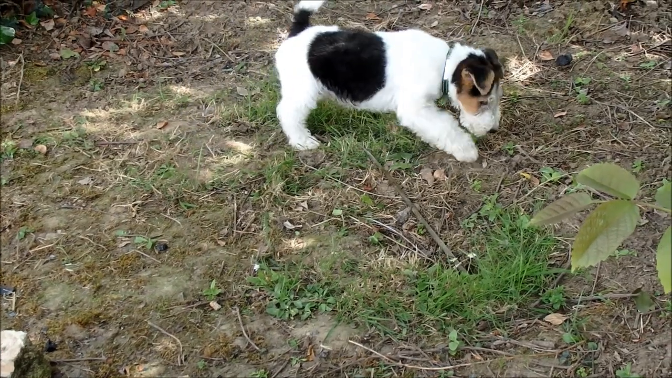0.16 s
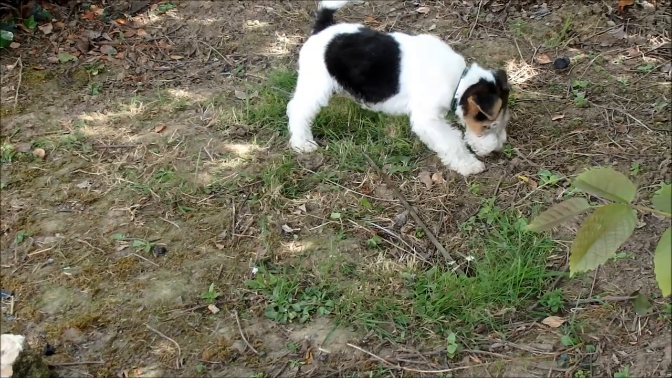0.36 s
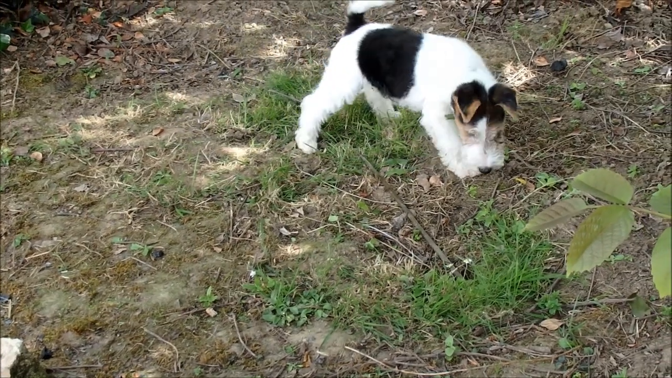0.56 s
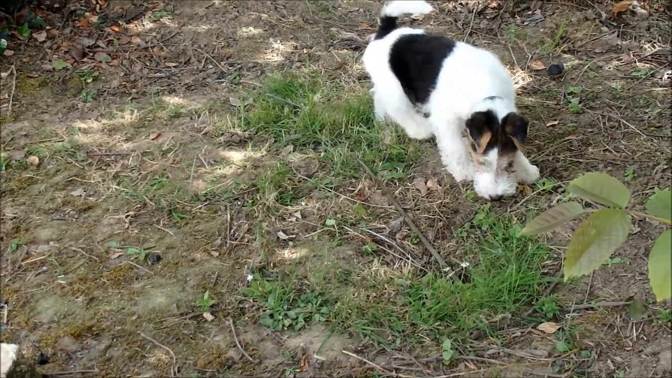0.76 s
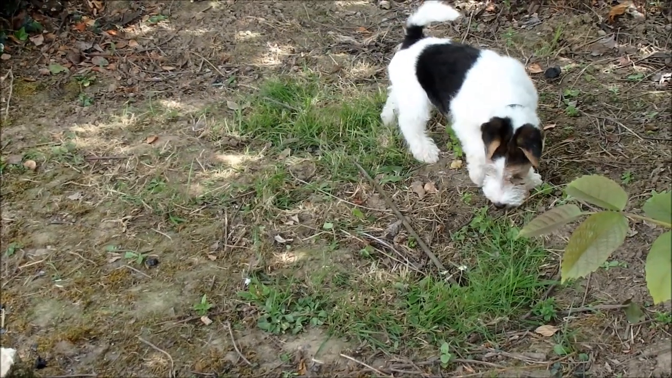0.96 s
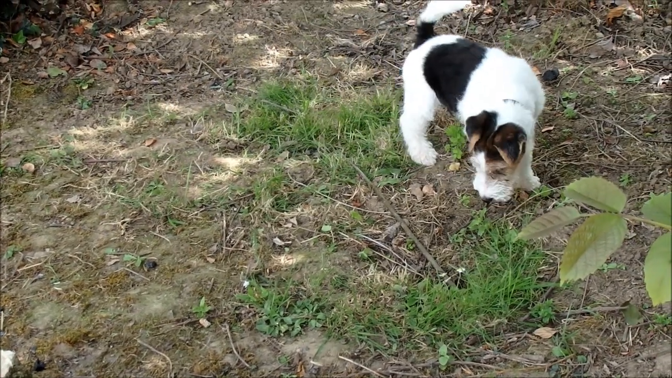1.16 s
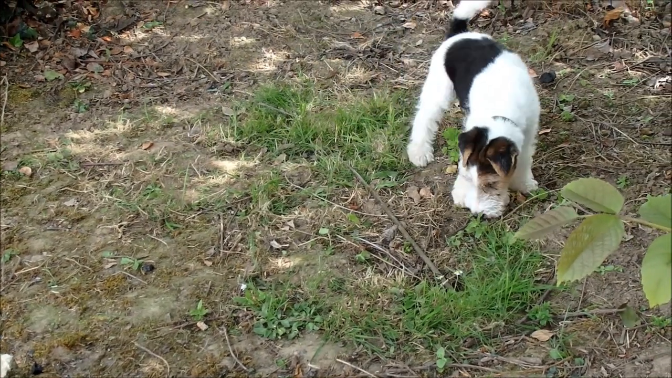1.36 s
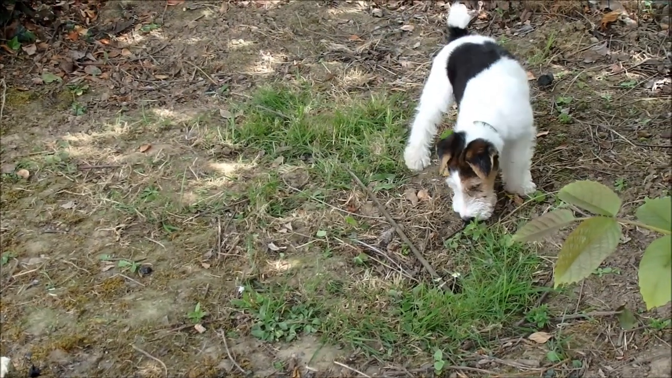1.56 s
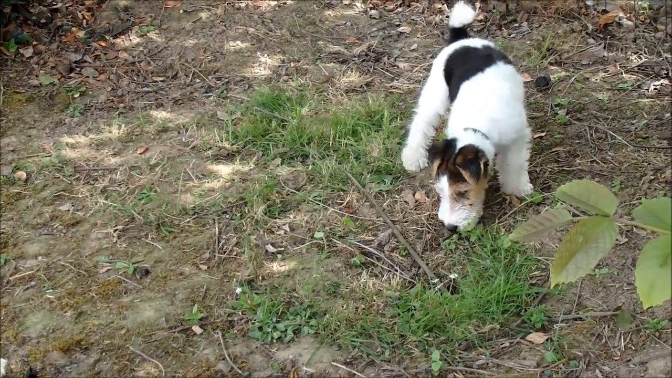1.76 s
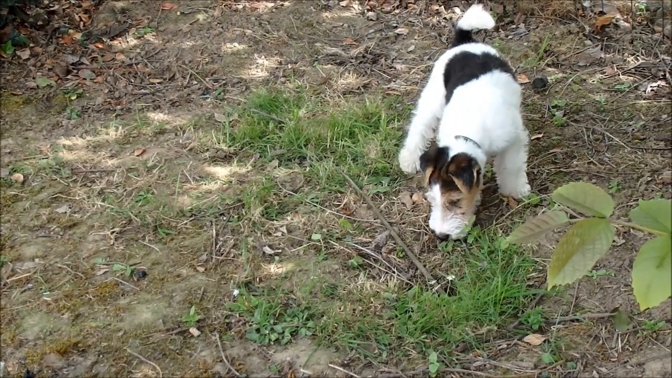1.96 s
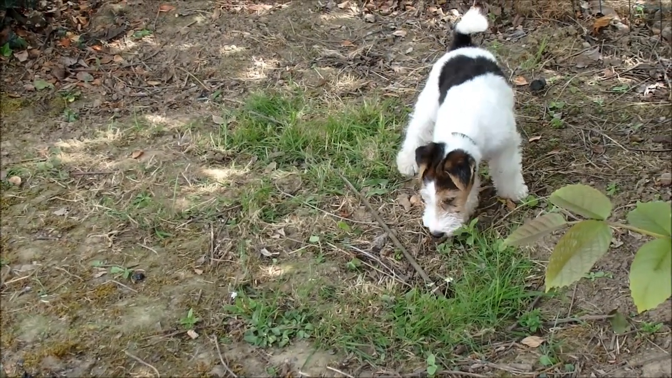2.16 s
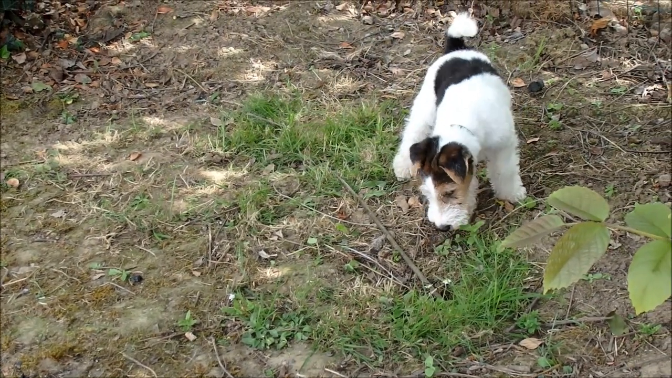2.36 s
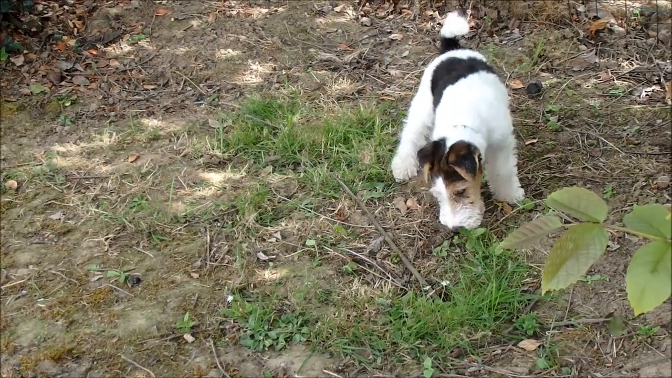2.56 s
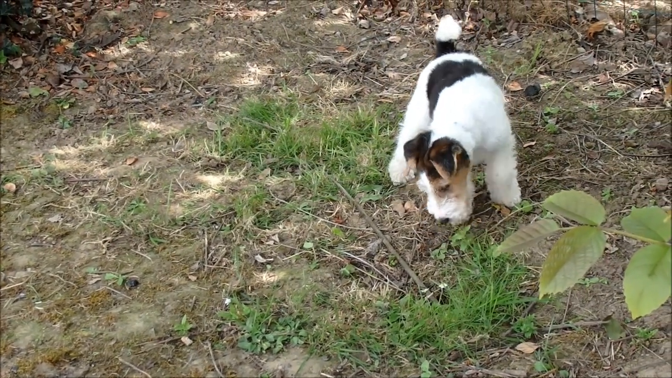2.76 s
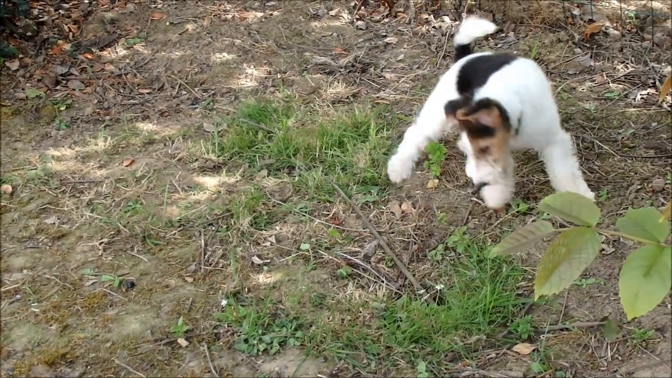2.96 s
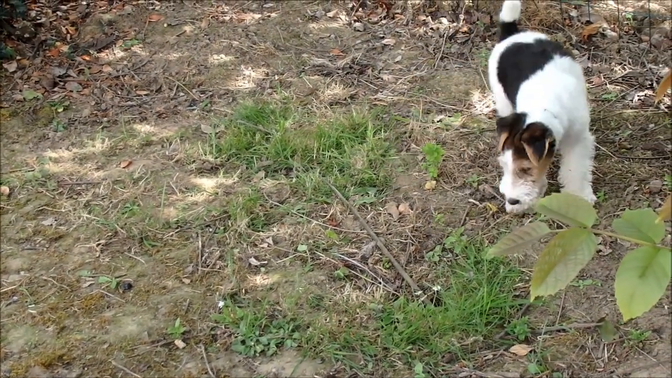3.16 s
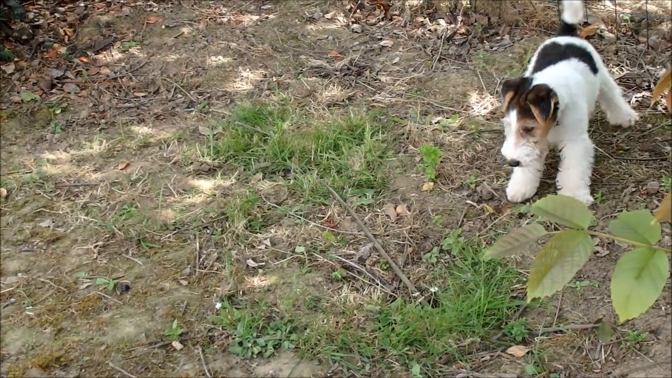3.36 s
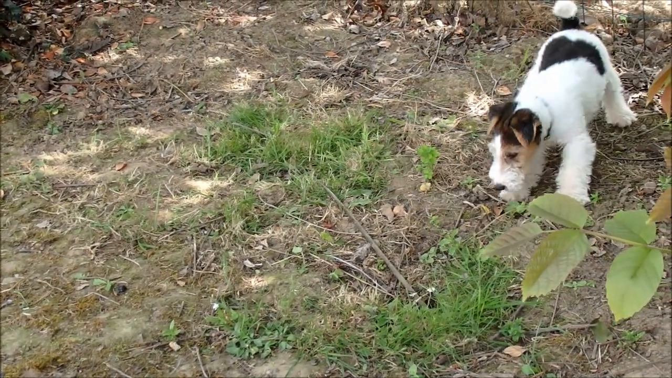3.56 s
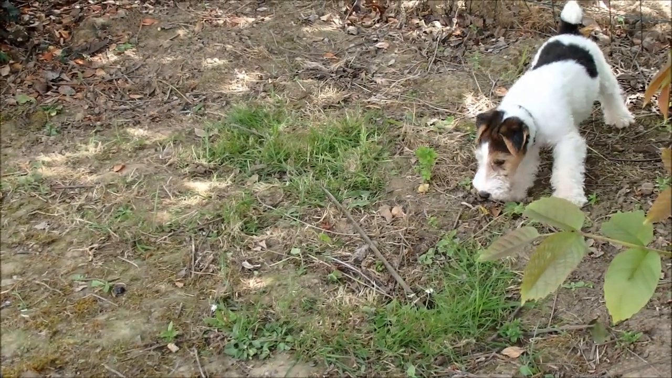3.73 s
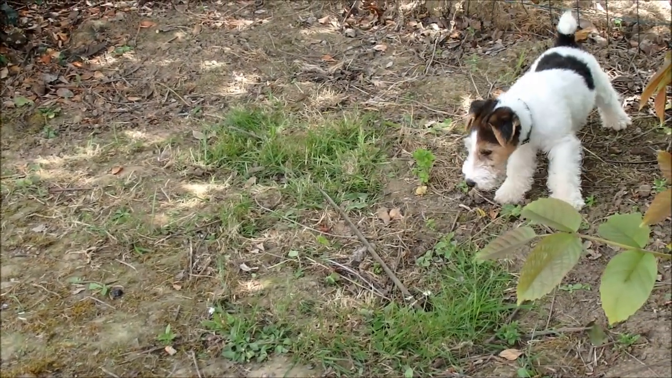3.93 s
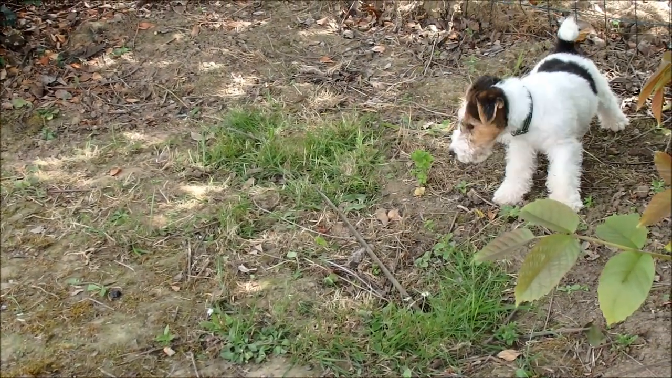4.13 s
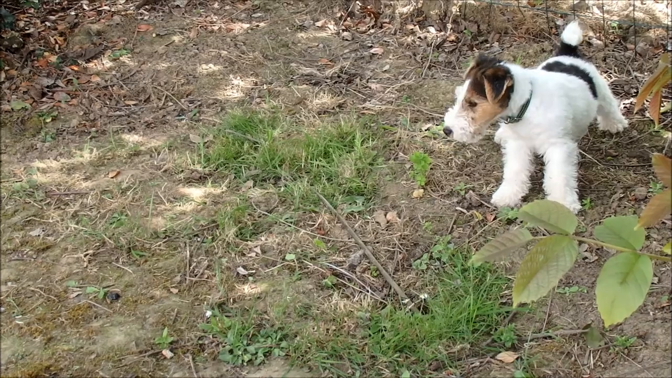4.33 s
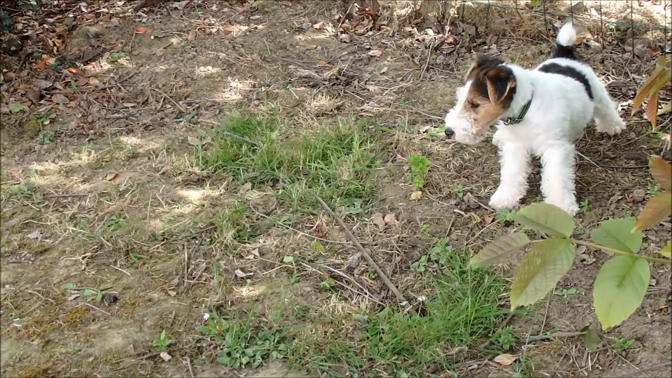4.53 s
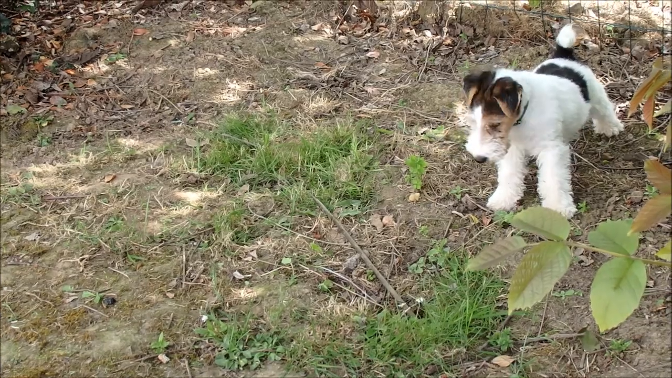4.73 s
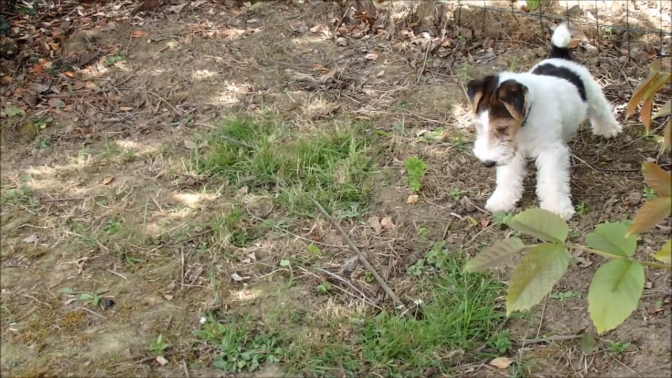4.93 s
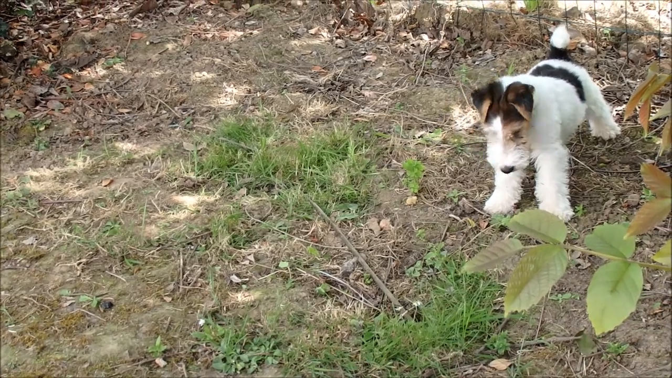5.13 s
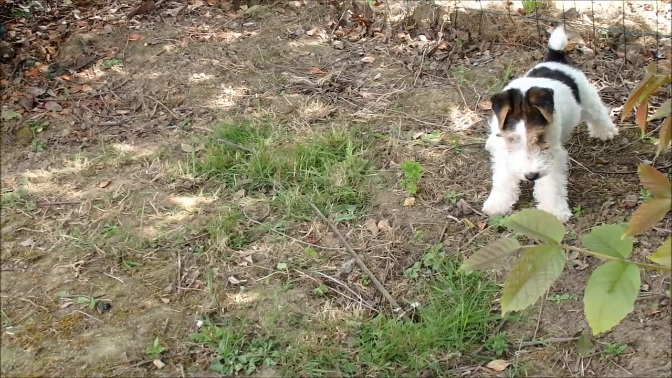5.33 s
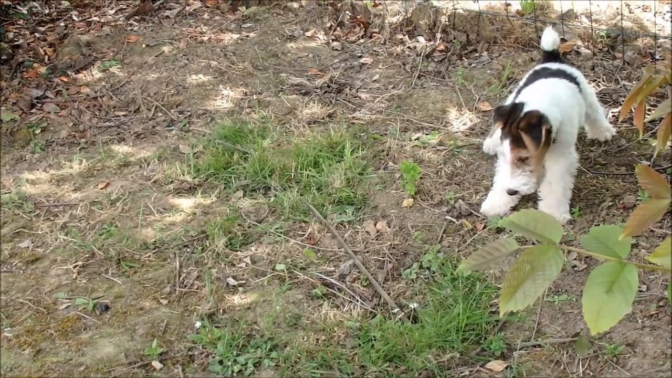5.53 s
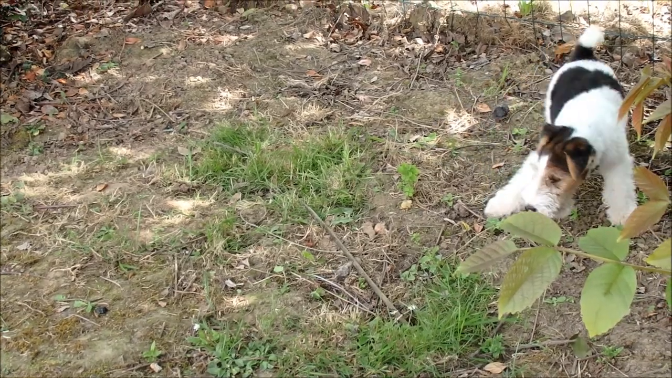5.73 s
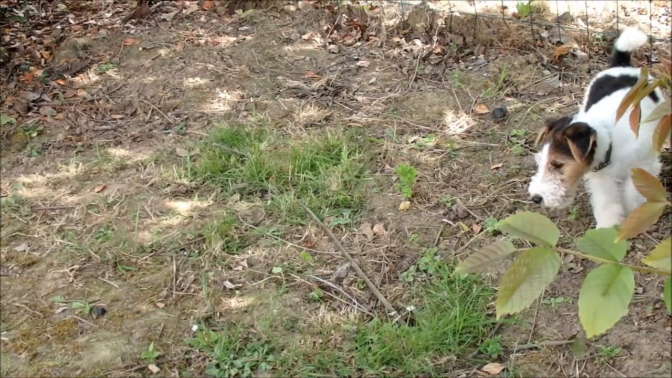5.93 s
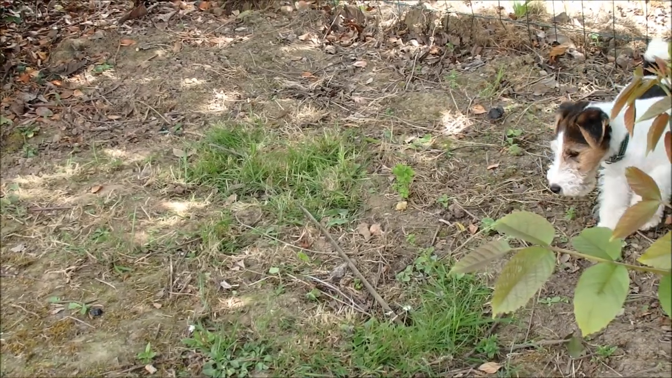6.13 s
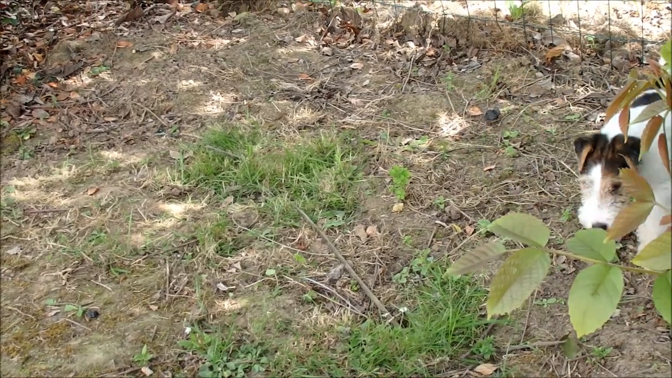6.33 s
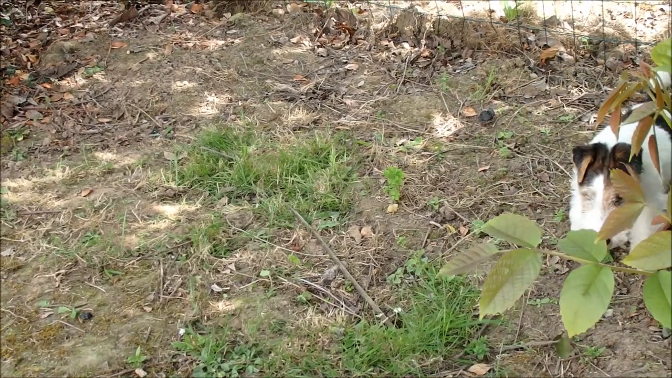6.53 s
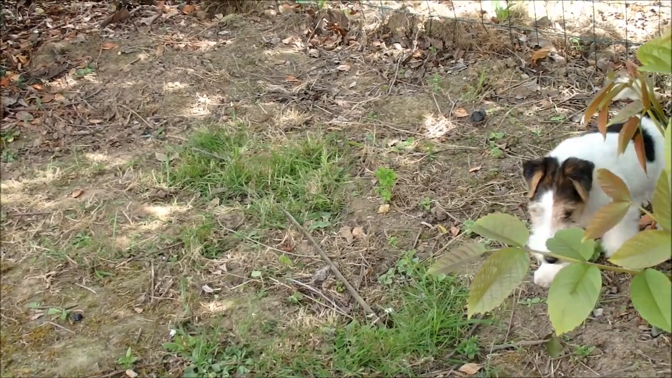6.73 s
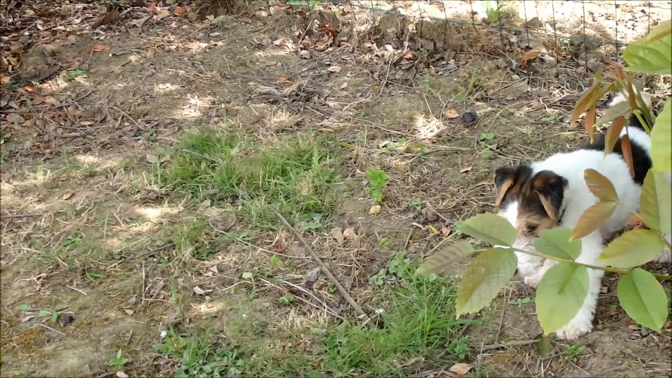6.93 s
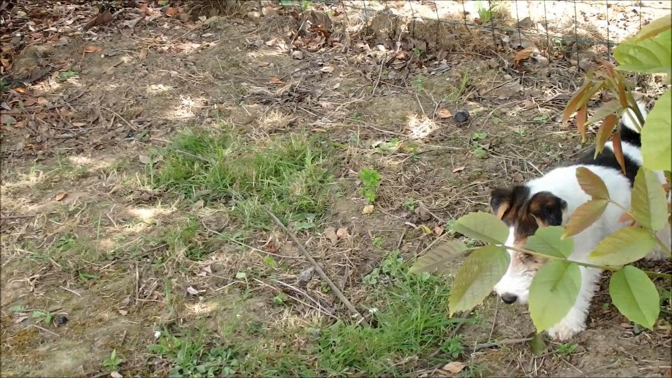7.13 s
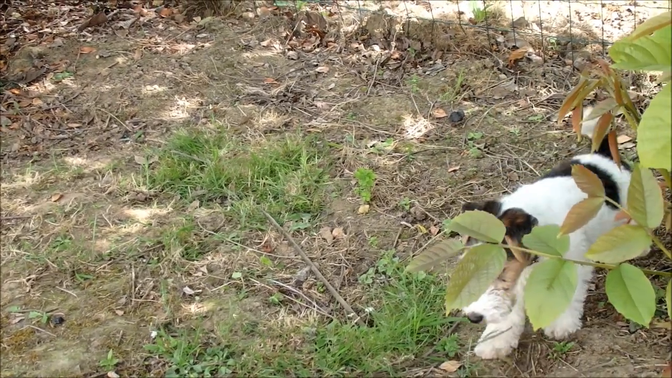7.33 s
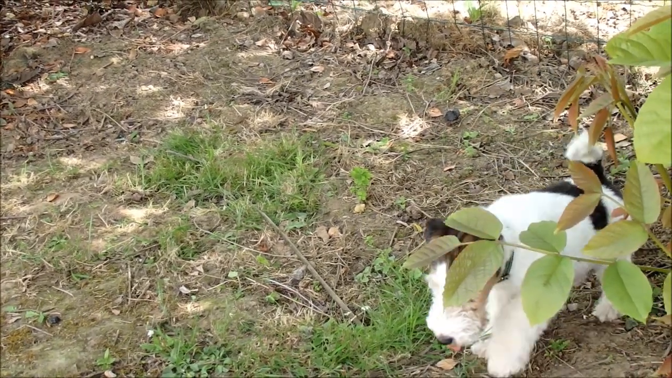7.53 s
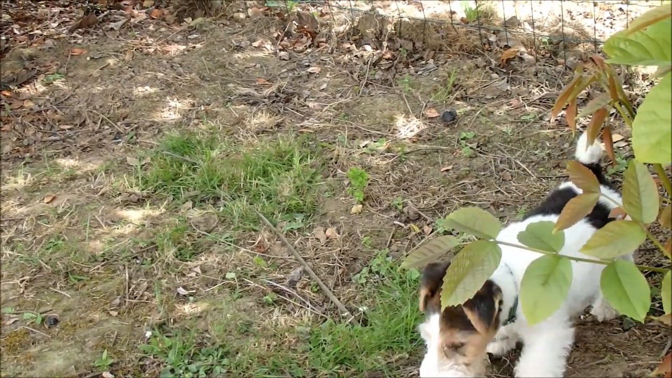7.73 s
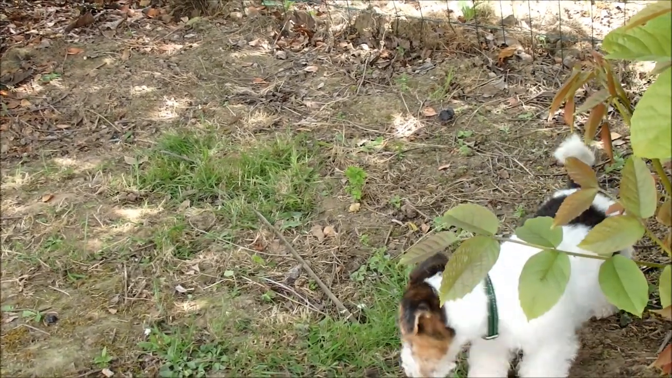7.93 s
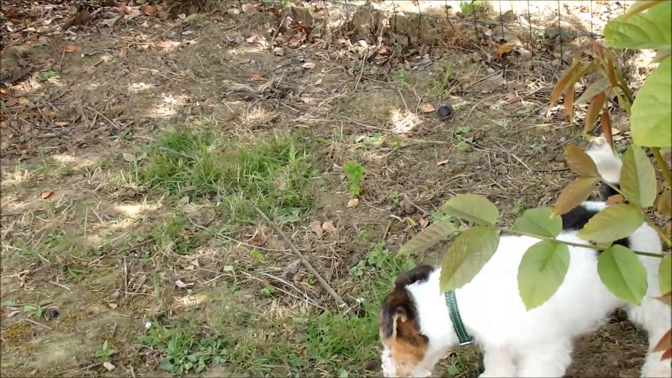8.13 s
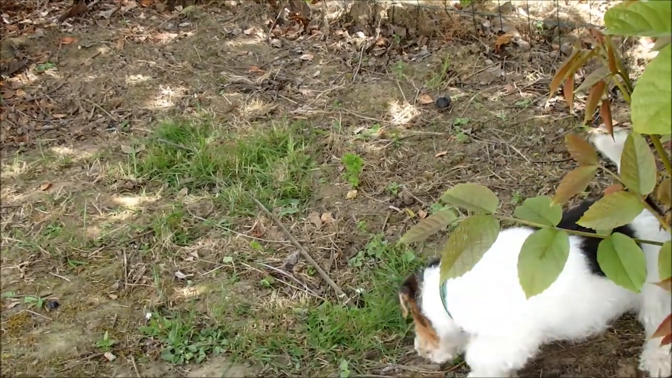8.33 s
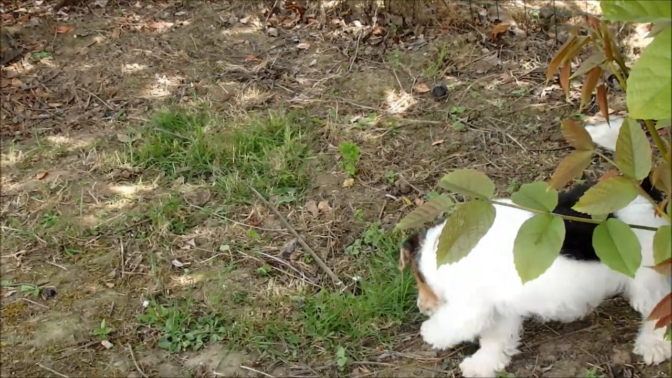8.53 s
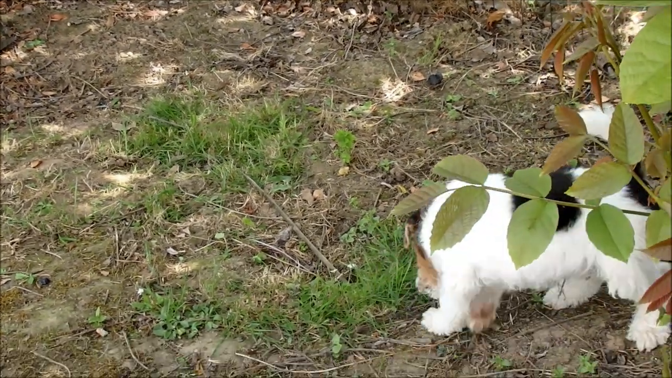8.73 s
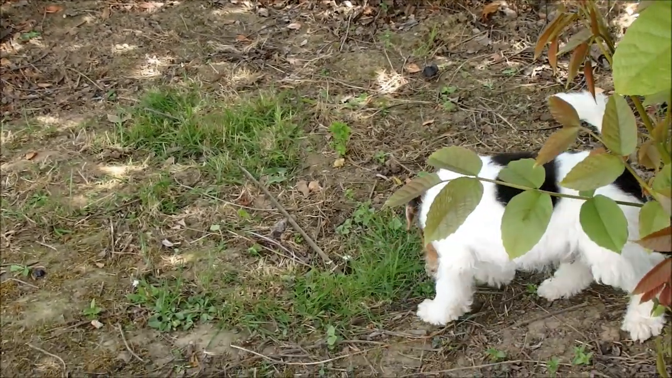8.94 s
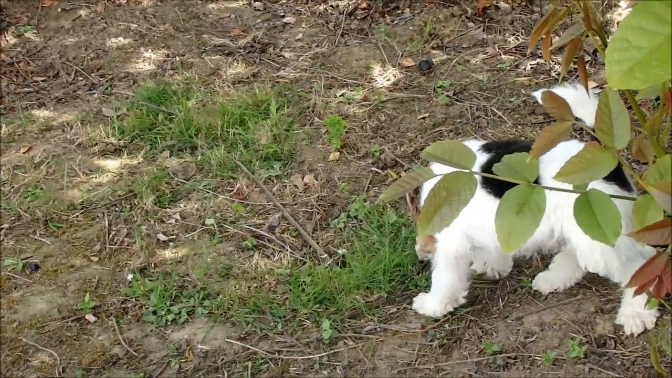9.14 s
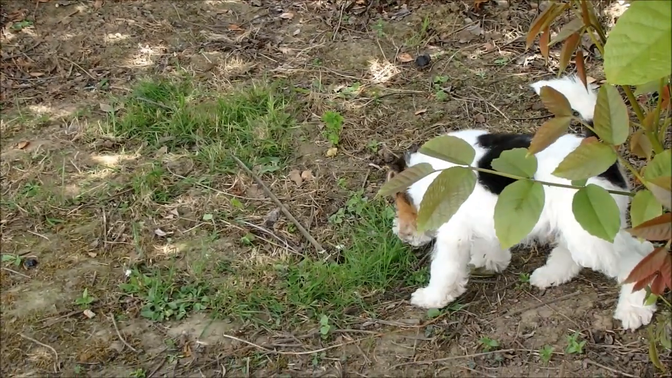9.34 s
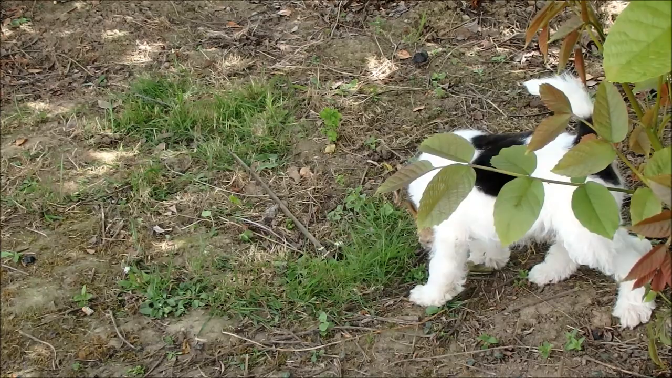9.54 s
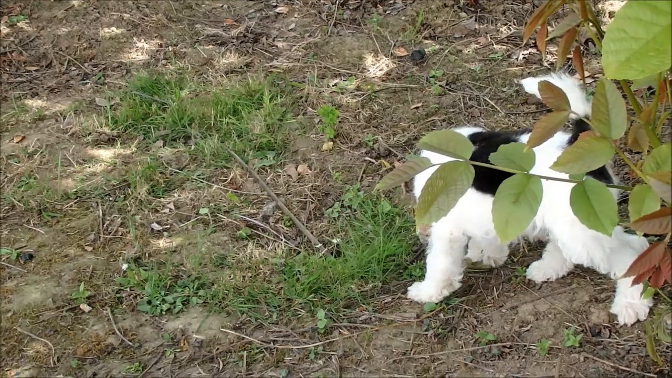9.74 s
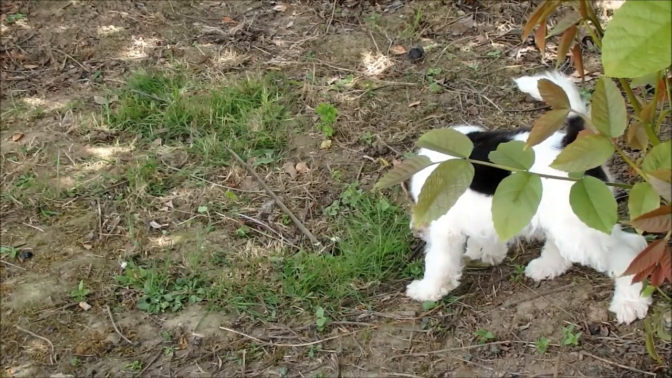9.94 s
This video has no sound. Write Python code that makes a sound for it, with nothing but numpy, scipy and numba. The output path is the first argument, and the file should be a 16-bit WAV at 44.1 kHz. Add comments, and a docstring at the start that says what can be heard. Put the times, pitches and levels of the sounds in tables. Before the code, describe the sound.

Soft outdoor hum with distant bird whistles, small paw crunches, two tiny metallic jingles, and a single sudden high puppy bark midway through.

```python
"""A motor buzz, a low breathy hoot over traffic hum and a far trill come first, in a garden on a handheld camera.
A terrier puppy two metres away yaps once near 5.7 s: swept vocal-fold harmonics through mouth and muzzle resonances.
Paws rustle dry leaves and a twig snaps (noise bursts), a collar ring jingles twice (struck partials),
far birds whistle (gliding sines) and fingers tick, slide and thump on the case, whose resonances the motor rings.
Sparse faint clicks lie throughout. The camera's gain control ducks at the yap, holds, then climbs back."""
import sys
import numpy as np
from scipy import signal
from scipy.fft import rfft, irfft, next_fast_len
from scipy.io import wavfile
from scipy.ndimage import uniform_filter1d
from numba import njit

SR = 44100
rng = np.random.default_rng(int(sys.argv[2]) if len(sys.argv) > 2 else 0)


def to_wav(s):
    """Save 16-bit WAV."""
    ch = np.atleast_2d(s).T  # columns
    pcm = np.round(np.clip(ch, -1, 1) * 32767)  # PCM
    wavfile.write(sys.argv[1], SR, pcm.astype(np.int16))


def decibels_to_gain(level_db):
    """Convert a level in decibels to a linear amplitude gain (20 dB per decade)."""
    exponent = np.asarray(level_db, float) / 20
    return 10 ** exponent


N = 440559
TIME = np.arange(N) / SR
SIDES = np.array([[1], [-1]])  # left and right microphone

# Air and town hum, sum of both microphones: f/Hz, relative density/dB
AIR_SPECTRUM = [(44, -31), (75, 1.5), (387, -8.5), (516, -14.5), (804, -7.5), (1370, -11), (1600, -11),
                (2280, -14), (2720, -11), (3250, -15), (4740, -18.5), (8620, -31), (12300, -30.5),
                (15000, -41.5)]
# The same air, difference of the microphones: f/Hz, relative density/dB
AIR_SIDE_SPECTRUM = [(12, -17.5), (20, -2.5), (139, 5.5), (1730, -10), (2690, -1), (3360, -5.5), (3970, -7),
                     (4820, -11), (5850, -5), (8860, -23), (12400, -16), (15000, -32.5)]
# Low breathy hoots: t/s, length/s, starting level/dB before flutter
HOOT_BREATHS = [(0, 0.59, -52), (0.965, 0.62, -50), (1.622, 0.39, -58.5), (7.556, 1.33, -57.5),
                (9.08, 0.44, -59.5)]
# Far traffic resonances: f/Hz, width/Hz, relative level/dB
TRAFFIC_BANDS = [(839, 92, 3.5), (1712, 430, 2.5)]
# Traffic coming and going: t/s, rms level/dB
TRAFFIC_SWELL = [(0, -57), (.9, -65), (1.28, -53.5), (1.7, -64.5), (2.7, -59.5), (4.3, -62), (5.6, -61.5),
                 (7.3, -55), (8.2, -52), (9.0, -51), (9.99, -54)]
# Deep hum tones: mean f/Hz, mean level/dB
HUM_TONES = [(29, -61), (51, -57)]
# Camera case resonances under the motor: f/Hz, width/Hz, mid level/dB, side level/dB, before slow wander
CASE_RINGS = [(690, 217, -61.5, -73.5), (2045, 215, -61, -75), (2435, 50, -62.5, -69),
              (2733, 257, -54.5, -61.5), (4100, 500, -103.5, -56.5), (4860, 200, -69.5, -84),
              (6020, 890, -69, -77)]
# Thin high trills, far off: t/s, length/s, start f/Hz, end f/Hz, level/dB before flutter
BIRD_TRILLS = [(0.075, 0.17, 8020, 8470, -54.5), (0.997, .36, 6200, 7380, -63.5),
               (1.545, 0.15, 7280, 7400, -61), (2.082, 0.19, 7220, 7300, -65.5),
               (2.55, .1, 7600, 7550, -68), (2.7, 0.16, 7300, 7800, -65), (2.923, .22, 7500, 7900, -65),
               (8.544, 0.21, 8320, 8800, -58), (8.71, .3, 8970, 8420, -55), (9.45, .2, 8200, 8250, -70),
               (9.615, .11, 8480, 8600, -63), (9.794, 0.063, 8100, 8000, -61)]
# Clear far notes: t/s, length/s, start f/Hz, end f/Hz, level/dB before flutter
BIRD_NOTES = [(1.718, .12, 2670, 2430, -48.5), (2.068, .089, 3300, 3220, -57),
              (2.943, .11, 4850, 4700, -62), (3.236, .085, 4000, 4300, -58),
              (3.773, 0.037, 4500, 4400, -56), (3.802, .022, 4300, 3220, -51.5),
              (4.049, .034, 3350, 4100, -56), (4.13, 0.027, 4400, 3670, -47),
              (4.17, 0.048, 3600, 3100, -48), (4.269, 0.061, 3600, 3375, -46.5),
              (4.249, 0.19, 2750, 3054, -48.5), (4.4, .04, 4000, 3360, -55), (4.7, 0.12, 4810, 4900, -62),
              (9.569, .068, 3100, 3130, -52.5), (9.57, 0.046, 3640, 3500, -55.5),
              (9.7, .05, 3600, 3140, -52), (9.74, .05, 3500, 3190, -55)]
# Faint twitter: t/s, length/s, start f/Hz, middle f/Hz, end f/Hz, level/dB before flutter, trill spread/Hz
BIRD_TWITTER = [(3.28, 0.38, 3510, 3850, 4050, -58.5, 330)]
# One long whistle, falling then lifting slightly: t/s, f/Hz, level/dB before flutter
BIRD_GLIDE = [(3.744, 8240, -63), (3.8, 7900, -69), (3.87, 6300, -59), (3.92, 5300, -50.5),
              (3.98, 4640, -48), (4.04, 4630, -53), (4.12, 4800, -45)]
# Finger ticks on the case: t/s, peak level of the mid part/dB, f/Hz
CASE_TICKS = [(2.1744, -44, 1500), (3.0194, -43, 3500), (4.7584, -51.5, 3500), (4.9447, -42, 3500),
              (5.0624, -40, 3500), (5.2594, -48, 2800), (5.343, -33.5, 2200), (5.3587, -32.5, 4000)]
# Fingers sliding on the case: t/s, length/s, level/dB before swell and side weights
CASE_SLIDES = [(2.3, .12, -64), (2.473, 0.087, -59), (2.55, .11, -53), (2.742, .17, -55), (2.98, .08, -66),
               (4.625, .05, -66)]
# Soft thumps: t/s, tone level/dB before onset and decay, f/Hz, t60/s
CASE_THUMPS = [(1.29, -28.5, 376, 0.084), (1.508, -30, 165, 0.056), (6.951, -36, 59.2, 0.048),
               (9.587, -34.5, 32.3, 0.17)]
# Paws in leaves: t/s, nominal crunch peak/dB, nominal crackle peak/dB, length/s
PAW_RUSTLES = [(.79, -62, -62, .03), (.8394, -53, -55, .054), (.887, -57, -56, 0.028),
               (1.247, -66, -63, 0.0056), (1.392, -54.5, -56, .03), (3.07, -49.5, -53.5, .033),
               (3.082, -48, -48, 0.037), (3.11, -51, -52, 0.024), (3.26, -55.5, -61, .024),
               (3.446, -49.5, -50.5, .043), (3.514, -53, -57, 0.032), (5.601, -61.5, -60.5, .018),
               (6.036, -41.5, -48, 0.057), (6.452, -50, -60, 0.044), (7.2, -55, -62, 0.041),
               (7.3267, -31.5, -45, 0.045), (7.417, -52.5, -60, 0.019), (7.556, -42, -50.5, .064),
               (7.628, -57, -66, .01), (7.693, -55.5, -69, 0.0083), (7.739, -52.5, -60, 0.033),
               (7.896, -56.5, -56, .037), (7.948, -55, -57, .014), (8.1394, -57, -61, .029),
               (8.24, -58.5, -57.5, 0.014), (8.873, -49, -56, 0.027), (9.643, -55.5, -68, .042)]
# Twig: t/s, peak level/dB before panning, f/Hz, length/s (strongest at half of it), left minus right/dB
TWIG_SNAPS = [(1.309, -32, 5300, .016, 5.5)]
# Collar ring struck: t/s, peak level/dB before panning, shake time/s, left minus right/dB from panning
COLLAR_JINGLES = [(0.9435, -24.5, 0.03, 6), (2.2014, -18, 0.033, 3.5)]
# Partials of the ring: f/Hz, relative level/dB, t60/s
RING_PARTIALS = [(11340, -15, 0.037), (11700, -7.5, 0.03), (12650, -8, .03), (12200, -6, 0.049),
                 (12090, -1.5, 0.049), (12300, -8.5, 0.026), (9250, -27, 0.017), (14000, -28.5, 0.0205)]
# Course of the yap: t/s, pitch f/Hz, mouth level/dB, muzzle level/dB, roughness 0-1
YAP_COURSE = [(5.728, 110.3, -53, -59, .6), (5.743, 150, -29.5, -51, 0.5), (5.765, 208, -25, -42, .5),
              (5.785, 301.2, -24, -29, .45), (5.803, 420.5, -12.5, -13.5, .35), (5.822, 545, 0.5, -3, 0.26),
              (5.836, 614, -10.5, -4, .25), (5.852, 663.2, -9, -3, .1), (5.875, 706, -12, -9, .08),
              (5.895, 674.6, -13.5, -7.5, .1), (5.907, 605.7, -14.5, -3, .22),
              (5.921, 496.3, -21.5, -15.5, .35), (5.94, 420.5, -22.5, -25.5, .4),
              (5.976, 293, -24, -41.5, .3), (6.019, 191.6, -39, -58.5, .2), (6.062, 118, -58, -58, .15)]
# Effort at each pitch: pitch f/Hz, fundamental level/dB, mouth resonance f/Hz
EFFORT_BY_PITCH = [(112, -48.5, 450), (150, -29, 490), (204, -22.5, 520), (392, -18, 830),
                   (505, -26.5, 1010), (545, -23, 1010), (635, -12.5, 1530), (700, -13.5, 1940)]
# Muzzle resonances with the jaw at factor 1: f/Hz, width before squaring/Hz, relative level/dB
MUZZLE_RESONANCES = [(2730, 1200, 5), (3400, 920, 11.5), (3960, 1550, 2), (4750, 540, -10),
                     (5600, 600, -31)]
# Jaw moving the muzzle resonances: t/s, frequency factor
JAW_FACTOR = [(5.75, 0.73), (5.8, 0.71), (5.84, 1.06), (5.895, 1.037), (5.93, 0.95)]


def unit(x):
    """Scale to rms 1."""
    return x / np.sqrt(np.mean(x ** 2))


def shaped(x, gain):
    """Filter by a gain given as a function of Hz."""
    size = next_fast_len(x.shape[-1])
    f = np.arange(1, size // 2 + 2) * SR / size
    return irfft(rfft(x, size) * gain(f), size)[..., :x.shape[-1]]


def noise_through(gain, size=N):
    """White noise filtered by a gain and scaled to rms 1."""
    return unit(shaped(rng.standard_normal(size), gain))


def peak(f, hz, width_hz):
    """A resonance with gain 1 at its centre and half that at the edges of its width."""
    return 1 / (1 + ((f - hz) / (width_hz / 2)) ** 2)


def walk(rate, size=N):
    """Smooth random wander, rms 1; a higher rate wanders faster."""
    k = max(int(SR / rate), 2)
    return unit(uniform_filter1d(uniform_filter1d(rng.standard_normal(size), k), k))


def panned(x, pan_db):
    """Place a sound between the two microphones by level, left minus right."""
    return x * decibels_to_gain(SIDES * pan_db / 2)


def add(out, s, x):
    """Mix x in at time s."""
    i = int(s * SR)
    out[..., i:i + x.shape[-1]] += x[..., :N - i]


def garden(x, t60, wet_db):
    """Scattered echoes from fences, trees and walls, different at each microphone."""
    t = np.arange(int(.5 * SR)) / SR
    # nothing returns in the first 6 ms
    tail = rng.standard_normal((2, len(t))) * decibels_to_gain(-60 * t / t60) * (t > .006)
    tail = tail[0] + 0.36 * SIDES * tail[1]
    tail = tail / np.sqrt(np.sum(tail[0] ** 2))
    return x + decibels_to_gain(wet_db) * signal.fftconvolve(x[None], tail, axes=1)[:, :N]


def coloured(points, db):
    """Noise on a spectrum, in octave bands that each flicker a little; db is its total rms level."""
    hz, level_db = np.transpose(points)
    x = shaped(rng.standard_normal(N), lambda f: decibels_to_gain(np.interp(np.log(f), np.log(hz), level_db)))
    total = np.zeros(N)
    for centre in 20 * 2 ** np.arange(11):
        octave = shaped(x, lambda f: np.cos(np.pi / 2 * np.clip(np.log2(f / centre), -1, 1)) ** 2)
        total += octave * decibels_to_gain(0.92 * walk(4.7) + 1.16 * walk(25))
    return decibels_to_gain(db) * unit(total)


def far():
    """Air and town hum, a low breathy hoot that comes and goes, and traffic that swells late."""
    hoot = noise_through(lambda f: peak(f, 397, 116))
    edge_s, fade_db = 0.056, -5.5  # each hoot loses level steadily over its length
    breaths = decibels_to_gain(-67.5)  # the hoot never quite stops
    for s, length, db in HOOT_BREATHS:
        fading = decibels_to_gain(db + fade_db * (TIME - s).clip(0, length) / length)
        gate = np.minimum(TIME - s + edge_s, s + length - TIME) / edge_s
        breaths = breaths + fading * gate.clip(0, 1)
    traffic = noise_through(lambda f: sum(decibels_to_gain(db) * peak(f, c, w) for c, w, db in TRAFFIC_BANDS))
    traffic = traffic * decibels_to_gain(np.interp(TIME, *np.transpose(TRAFFIC_SWELL)))
    mid = hoot * breaths * decibels_to_gain(1.5 * walk(5)) + traffic
    return mid + coloured(AIR_SPECTRUM, -50) + SIDES * coloured(AIR_SIDE_SPECTRUM, -56.5)


def hum():
    """Deep sine tones waver in pitch and level, a little differently left and right."""
    def tone(hz):
        path_hz = hz * (1 + 0.0798 * walk(25.4))
        return np.sin(2 * np.pi * np.cumsum(path_hz) / SR) * decibels_to_gain(2.2 * walk(9))
    return sum(np.sqrt(2) * decibels_to_gain(db) * (tone(hz) + 0.31 * SIDES * tone(hz)) for hz, db in HUM_TONES)


def motor():
    """One knock a turn, strong and weak in turn, over bearing noise, rings the case."""
    turn = np.floor(TIME * 59.94)  # turns per second
    knocks = (np.diff(turn, prepend=0) > 0) * (1 + 0.22 * (-1) ** turn)
    drive = .5 * unit(knocks) + rng.standard_normal(N)
    out = np.zeros((2, N))
    for hz, width, mid_db, side_db in CASE_RINGS:
        ring = unit(shaped(drive, lambda f: peak(f, hz, width)))
        out += ring * decibels_to_gain(1.0 * walk(5)) * (decibels_to_gain(mid_db) + SIDES * decibels_to_gain(side_db))
    return out


def faint_clicks():
    """Sparse faint random clicks, bright and spread left and right: single-sample impulses, filtered."""
    level_db = -49.5 + 1.3 * rng.exponential(size=(2, N)).clip(0, 3)  # before filtering
    clicks = (rng.random((2, N)) < 40 / SR) * decibels_to_gain(level_db)
    return shaped(clicks[0] + .5 * clicks, lambda f: peak(f, 11000, 13000) ** 2 * (f < 14300))


def whistle(hz, db, trill_hz):
    """One bird sound, a sine on a pitch path: it trills, flutters and swells."""
    u = np.linspace(0, 1, len(hz))
    hz = hz + trill_hz * walk(247, len(u))
    level = np.sqrt(2) * decibels_to_gain(db + 3.3 * walk(53, len(u)))
    swell = np.abs(np.sin(np.pi * u)) ** .5
    return level * swell * np.sin(2 * np.pi * np.cumsum(hz) / SR)


def birds():
    """Far whistles that bend through three pitches, and one long glide; the trees smear them."""
    out = np.zeros(N)
    # trills arch: their middle lies 2 % above the mean of the ends
    calls = [(s, length, a, (a + b) / 2 * 1.02, b, db, 203) for s, length, a, b, db in BIRD_TRILLS]
    # notes settle: 62 % of the slide is done by half time
    calls += [(s, length, a, a + .62 * (b - a), b, db, 46) for s, length, a, b, db in BIRD_NOTES]
    for s, length, *pitch_hz, db, trill_hz in calls + BIRD_TWITTER:
        u = np.arange(0, 1, 1 / (length * SR))
        bend = np.polyfit([0, .5, 1], pitch_hz, 2)
        add(out, s, whistle(np.polyval(bend, u), db, trill_hz))
    s, hz, db = np.transpose(BIRD_GLIDE)
    t = np.arange(s[0], s[-1], 1 / SR)
    add(out, s[0], whistle(uniform_filter1d(np.interp(t, s, hz), 900), np.interp(t, s, db), 55))
    return garden(out, 0.49, wet_db=0.5)


def handling():
    """Fingers on the case: ticks reach the microphones unlike, slides mostly opposed, thumps low and round."""
    out, t = np.zeros((2, N)), np.arange(int(.2 * SR)) / SR
    for s, db, hz in CASE_TICKS:
        burst = rng.standard_normal((2, len(t))) * np.exp(-t / .0015)
        mid, other = shaped(burst, lambda f: peak(f, hz, 1.6 * hz) ** 2 + peak(f, 2800, 500))
        add(out, s, decibels_to_gain(db) * (mid + 1.5 * SIDES * other) / np.abs(mid).max())
    for s, length, db in CASE_SLIDES:
        rub = noise_through(lambda f: peak(f, 7000, 2000), len(t))
        add(out, s, decibels_to_gain(db) * (.3 + SIDES) * rub * np.sin(np.pi * np.minimum(t / length, 1)))
    for s, db, hz, t60 in CASE_THUMPS:
        body = np.sin(2 * np.pi * hz * t) + 0.48 * walk(8 * hz, len(t))
        add(out, s, decibels_to_gain(db - 60 * t / t60) * body * (1 - np.exp(-t / 0.0054)))
    return out


def rustles():
    """Paws crush leaves and twigs: bursts of tiny cracks, dull crunch plus crackle that scatters left and right."""
    out, t = np.zeros((2, N)), np.arange(int(.2 * SR)) / SR
    for s, crunch_db, crackle_db, length in PAW_RUSTLES:
        tone, place = rng.standard_normal(2)
        crunch_hz, pan_db = 4060 * (1 + .05 * tone), -0.2 + 1.5 * place
        chance = rng.standard_normal((3, len(t)))
        onset = .3 + .7 * (1 - np.exp(-t / (0.22 * length)))
        cracks = chance[:2] * decibels_to_gain(8.4 * chance[2]) * np.exp(-(t / length) ** 1.9) * onset
        low = shaped(cracks[0], lambda f: peak(f, crunch_hz, 4240)
                     * peak(np.minimum(f, crunch_hz), crunch_hz, 4300))
        high = shaped(cracks[0] + .4 * SIDES * cracks[1], lambda f: peak(f, 11200, 4000) * (f < 14300))
        # shorter bursts are made stronger
        burst_scale = 1 / np.sqrt(length / t[-1]) / 9.16
        burst = decibels_to_gain(crunch_db) * unit(low) + decibels_to_gain(crackle_db) * unit(high)
        add(out, s, panned(burst_scale * burst, pan_db))
    return out


def snap():
    """A twig gives a short narrow crack: a noise burst through one resonance and a weak brighter one."""
    out, t = np.zeros((2, N)), np.arange(int(.15 * SR)) / SR
    for s, db, hz, length, pan_db in TWIG_SNAPS:
        burst = rng.standard_normal(len(t)) * t / length * np.exp(-t / length * 2)
        crack = shaped(burst, lambda f: peak(f, hz, 900) + 0.15 * peak(f, 7500, 4500) ** 2)
        add(out, s, panned(decibels_to_gain(db) * crack / np.abs(crack).max(), pan_db))
    return out


def jingles():
    """A small metal collar ring is struck, then rattles and settles: random blows excite decaying partials."""
    out, t = np.zeros((2, N)), np.arange(int(.12 * SR)) / SR
    ring = sum(decibels_to_gain(db - 60 * t / t60) * np.sin(2 * np.pi * hz * t) for hz, db, t60 in RING_PARTIALS)
    ring = ring * (1 - np.exp(-t / .0003)) ** 2
    for s, db, shake, pan_db in COLLAR_JINGLES:
        struck = rng.random(len(t)) < 700 / SR  # blows per second
        blows = struck * rng.standard_normal(len(t)) * 0.57 * np.exp(-(t / shake) ** 1.73)
        blows[0] = 1
        sound = np.convolve(blows, ring)
        # the microphones are apart, so the right one hears it a fraction of a cycle late
        late = np.array([sound, 0.88 * sound + .45 * np.roll(sound, 1)])
        add(out, s, panned(decibels_to_gain(db) * late / np.abs(sound).max(), pan_db))
    return out


def muzzle_gain(f):
    """The muzzle's resonances side by side."""
    return sum(decibels_to_gain(db) * peak(f, centre, width) ** 2 for centre, width, db in MUZZLE_RESONANCES)


def case_ring(x):
    """The yap sets a narrow resonance of the camera case ringing, a little unsteadily."""
    t = np.arange(int(.6 * SR)) / SR
    ring = decibels_to_gain(-74 - 60 * t / .9) * np.sin(2 * np.pi * 2050 * t + 1.2 * walk(60, len(t)))
    return signal.fftconvolve(x, ring)[:N]


def yap():
    """Vocal folds sweep up and down; mouth and muzzle resonances pick out their harmonics."""
    s, *columns = np.transpose(YAP_COURSE)
    t = np.arange(s[0], s[-1], 1 / SR)
    size = len(t)
    hz, mouth_db, muzzle_db, rough = (uniform_filter1d(np.interp(t, s, c), 400) for c in columns)
    # effort lifts the pitch and opens the mouth
    pitch_hz, *laws = np.transpose(EFFORT_BY_PITCH)
    chest_db, mouth_hz = (uniform_filter1d(np.interp(hz, pitch_hz, law), 200) for law in laws)

    # uneven folds: the pitch wobbles from cycle to cycle, most of all when they are slack and slow
    wobble = .1 * rough * np.sqrt(700 / hz) * walk(hz.max() / 2, size)
    phase = 2 * np.pi * np.cumsum(hz * (1 + wobble)) / SR
    k = np.arange(2, 50)[:, None]
    f = k * hz
    jaw = np.interp(t, *np.transpose(JAW_FACTOR))
    muzzle = muzzle_gain(f / jaw) * peak(np.minimum(f, 2400), 2380, 300) ** 2
    mouth = peak(f, mouth_hz, 0.47 * mouth_hz) * peak(np.maximum(f, 2200), 2400, 300) ** 2
    # the tract delays each harmonic differently, so the pulses spread out
    mouth_lag = np.arctan((f - mouth_hz) / (0.24 * mouth_hz))
    partials = np.cos(k * phase - (f / 1100) ** 2 - np.pi / 2 - mouth_lag)

    def band(db, shape):
        return decibels_to_gain(db) * np.sum(shape * partials, axis=0) / np.linalg.norm(shape, axis=0)

    shimmer = np.sqrt(2) * decibels_to_gain(4.5 * rough * walk(500, size))
    breath = noise_through(muzzle_gain, size)
    # loose folds growl: noise let through once a cycle
    pulsed = rng.standard_normal(size) * (1 + np.cos(phase))
    growl = unit(shaped(pulsed, lambda f: peak(f, 650, 700) ** 2))
    # air whistles raggedly past the teeth, in a dull and a sharp band
    dull, sharp = (noise_through(lambda f: peak(f, c, w) ** 2, size) * decibels_to_gain(3. * walk(90, size))
                   for c, w in ((6300, 2500), (10800, 3500)))

    low = shimmer * (decibels_to_gain(chest_db) * np.cos(phase) + band(mouth_db, mouth))
    low = low + decibels_to_gain(0.88 * mouth_db - 35.5) * dull
    low = low + rough * decibels_to_gain(mouth_db) * (0.094 * breath + 0.72 * growl)
    high = shimmer * band(muzzle_db, muzzle) + 1.1 * rough * decibels_to_gain(muzzle_db) * breath
    high = high + decibels_to_gain(0.63 * muzzle_db - 37.5) * sharp

    # 5 ms fade in, 20 ms fade out
    edges = np.minimum(np.minimum(t - t[0], (t[-1] - t) / 4) / .005, 1)
    # the muzzle points away, so its bright band comes mostly by a bounce off something hard nearby
    bounce_s, bounce_low_db, direct_high_db = .013, -12, -12.5
    out = np.zeros(N)
    add(out, s[0], (low + decibels_to_gain(direct_high_db) * high) * edges)
    add(out, s[0] + bounce_s, (decibels_to_gain(bounce_low_db) * low + high) * edges)
    without_rumble = shaped(out, lambda f: 1 / (1 + (120 / f) ** 4))
    return garden(without_rumble, 0.45, -22) + case_ring(out)


def scene():
    """Everything that reaches the two microphones."""
    background = far() + hum() + motor() + faint_clicks() + birds()
    return background + handling() + rustles() + snap() + jingles() + yap()


@njit
def duck(want_db, attack, hold, rise_db):
    """Gain in dB: falls fast to what is wanted, waits, then climbs at a steady rate."""
    out, g, wait = np.empty(len(want_db)), 0., 0.
    for i in range(len(want_db)):
        if want_db[i] < g:
            g, wait = g + attack * (want_db[i] - g), hold
        elif wait > 0:
            wait -= 1
        else:
            g = min(g + rise_db, 0.)
        out[i] = g
    return out


def top_cut(x):
    """Nothing passes above the cut-off."""
    return signal.sosfilt(signal.butter(12, 14950, fs=SR, output="sos"), x)


def record(dry):
    """Gain control pulls down whatever passes its threshold; the tallest peaks clip."""
    power = uniform_filter1d(np.mean(dry ** 2, axis=0), 440)  # over 10 ms
    level_db = 10 * np.log10(power + 1e-12)
    want_db = -.6 * np.maximum(level_db + 18.0, 0)  # threshold -18 dB
    attack_s, hold_s, rise_db_per_s = 0.0065, .55, 13.0
    gain_db = duck(want_db, 1 / (attack_s * SR), hold_s * SR, rise_db_per_s / SR)
    return top_cut((dry * decibels_to_gain(gain_db)).clip(-.86, .86))


dry = scene()
out = record(dry)
to_wav(out)
```